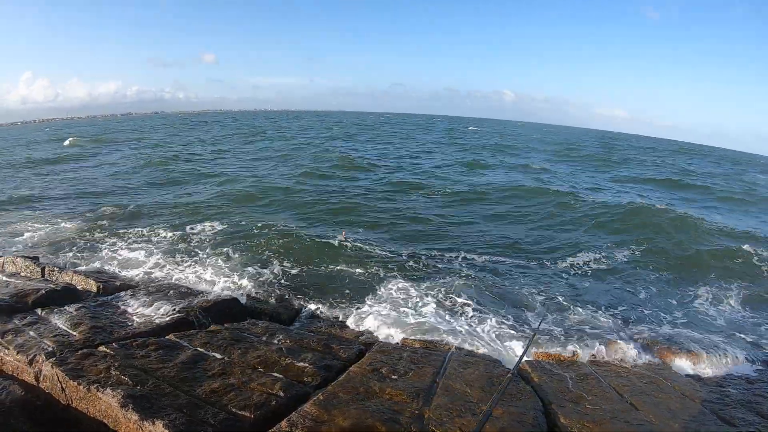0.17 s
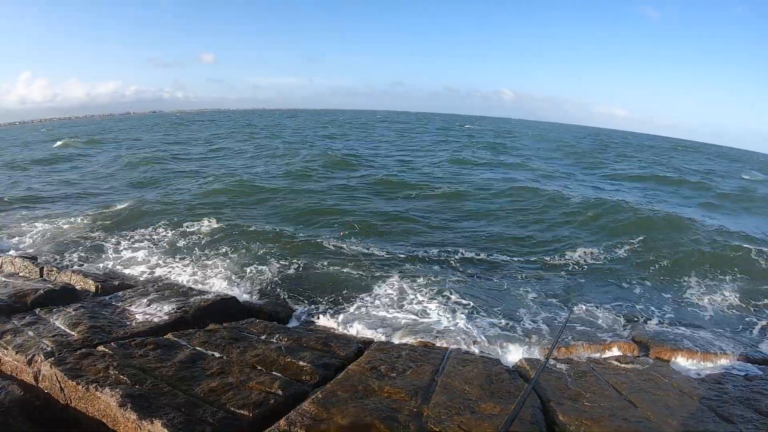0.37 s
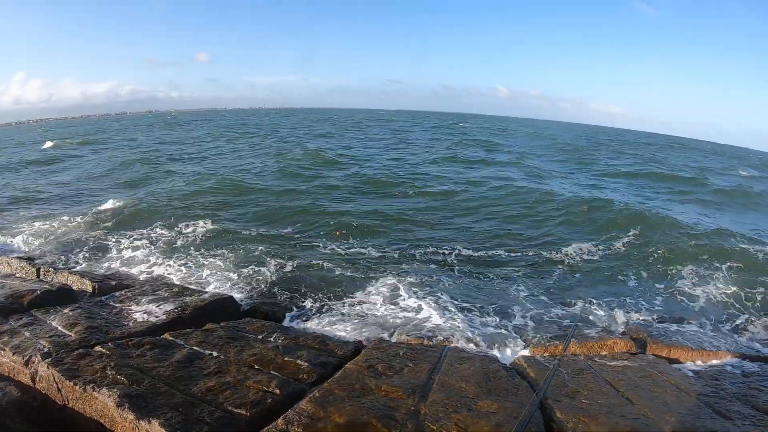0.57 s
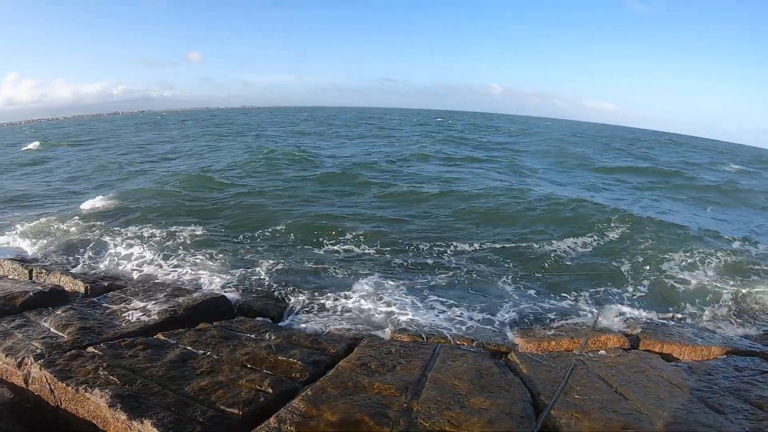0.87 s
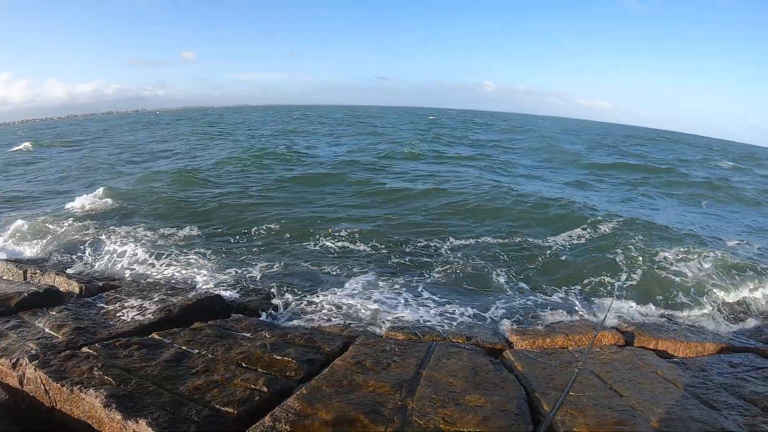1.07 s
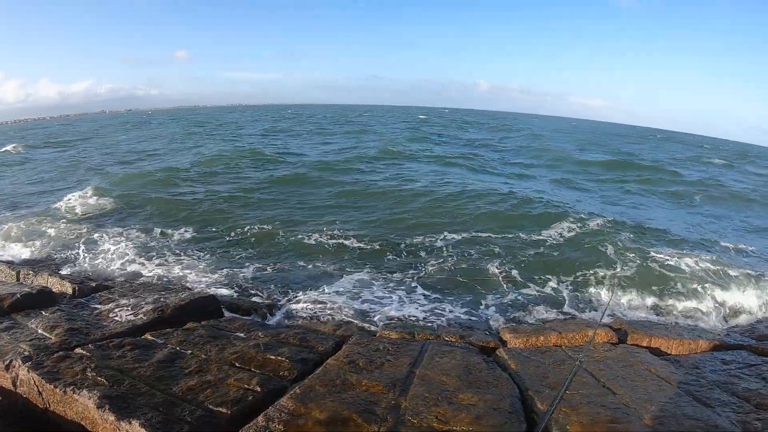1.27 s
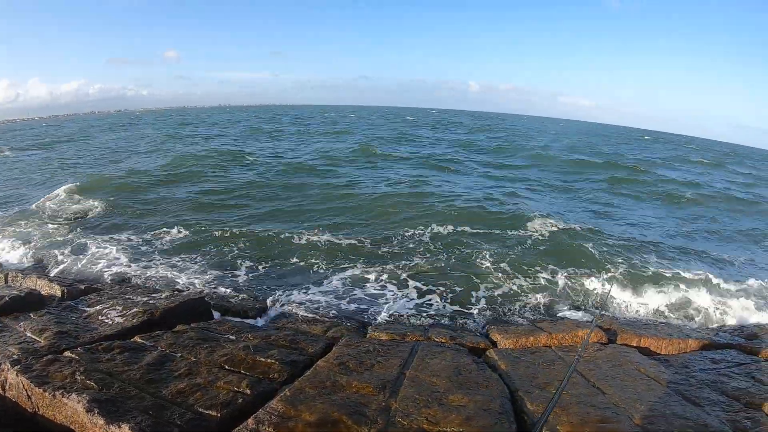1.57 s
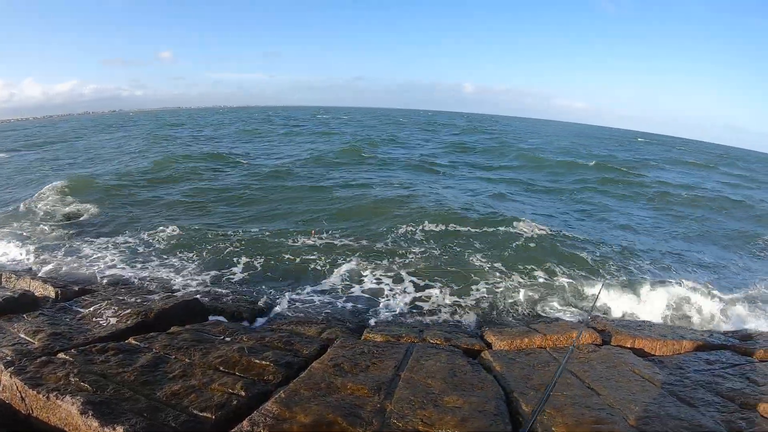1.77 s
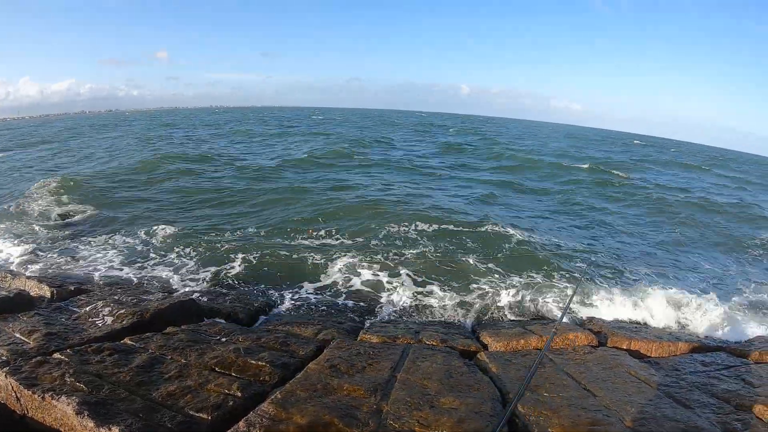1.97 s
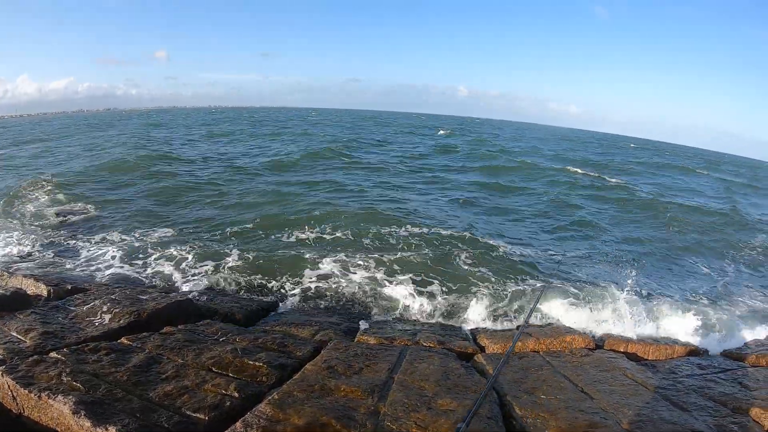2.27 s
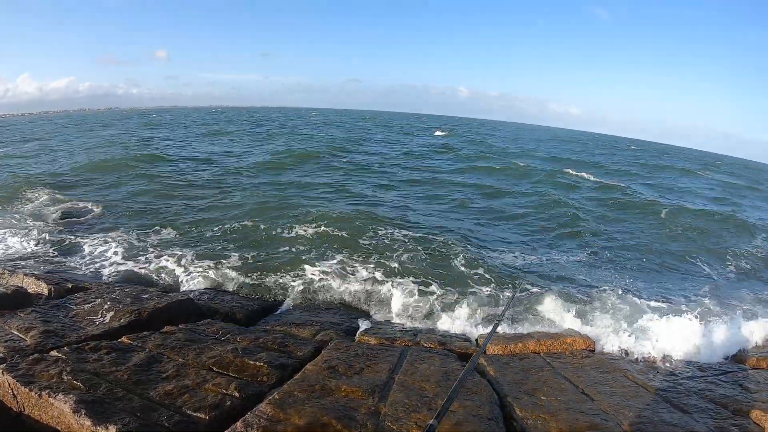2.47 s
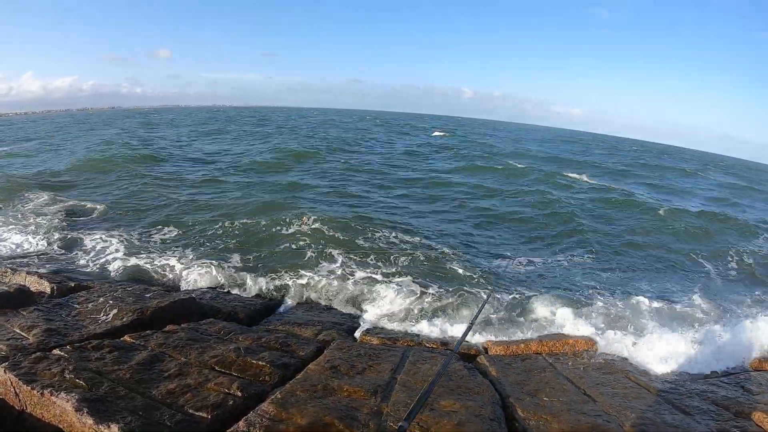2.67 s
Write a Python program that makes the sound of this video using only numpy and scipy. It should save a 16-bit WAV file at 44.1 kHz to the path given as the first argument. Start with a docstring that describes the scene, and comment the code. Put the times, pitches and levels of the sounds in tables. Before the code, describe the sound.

Sea waves wash against rocks a few metres away: low churn, one hollow clap, gulping bubbles and small slaps, then a brighter hissing breaker; outdoors, close mono microphone heavily buffeted by deep, uneven wind.

```python
"""Flat rocks of a jetty, a few metres from the waves: a low churn of water with gulping bubbles, a rising fizz
of foam and spray, a few slaps, one hollow clap and a late breaker. The wash is coloured noise with crowds of
chirping bubbles; the clap is a set of decaying modes. The slab in front and a nearer ledge mirror the wash,
combing its sound. Strong wind buffets the microphone: a deep uneven rumble of softly saturated low noise."""
import sys
import numpy as np
from scipy import signal
from scipy.fft import rfft, irfft, next_fast_len
from scipy.io import wavfile
from scipy.ndimage import uniform_filter1d, map_coordinates

SR = 44100
rng = np.random.default_rng(int(sys.argv[2]) if len(sys.argv) > 2 else 0)


def transcribe(signal):
    """Save signal, clipped to [-1, 1], as a 16-bit WAV file at the path in sys.argv[1]."""
    frames = np.atleast_2d(signal).T
    limited = np.clip(frames, -1, 1)
    pcm = np.round(limited * 32767).astype(np.int16)
    wavfile.write(sys.argv[1], SR, pcm)


def decibels_to_gain(level_db):
    """Convert a level in decibels to a linear amplitude gain (20 dB per decade)."""
    exponent = np.asarray(level_db, float) / 20
    return 10 ** exponent


N = 123479  # length in samples


def unit(x):
    """Scaled to rms 1."""
    return x / np.sqrt(np.mean(x ** 2) + 1e-20)


def curves(rows, at):
    """Every column after the first, read between the rows at the given times or pitches."""
    first, *columns = np.transpose(rows)
    return [np.interp(at, first, column) for column in columns]


def wobble(rate):
    """A smooth random curve with the given number of random knots a second."""
    knots = rng.standard_normal(N // 200)
    return map_coordinates(knots, [np.arange(N) * rate / SR])


def coloured(x, colour):
    """x filtered by (pitch_hz, relative gain_db) points, joined over log pitch, then scaled to rms 1."""
    size = next_fast_len(N + 8192)
    hz, gain_db = np.transpose(colour)
    log_pitch = np.log(np.fft.rfftfreq(size, 1 / SR) + .1)
    gain = decibels_to_gain(np.interp(log_pitch, np.log(hz + .1), gain_db, left=-120))
    return unit(irfft(rfft(x, size) * gain, size)[:N])


def patchy(patchy_db):
    """Noise with patches of random gain over frequency and time, rms 1."""
    spectrum = signal.stft(rng.standard_normal(N), nperseg=512)[2]
    field = uniform_filter1d(rng.standard_normal(spectrum.shape), size=6, axis=0)
    field = uniform_filter1d(field, size=10, axis=1)
    return unit(signal.istft(spectrum * decibels_to_gain(patchy_db * unit(field)), nperseg=512)[1][:N])


def bubbles(start_s, hz, peak_db, cycles, rise, size):
    """Damped sines of rising pitch with a soft start, each cut off after size samples."""
    t = np.arange(size) / SR
    life = t * (hz / cycles)[:, None]  # 1 after the given cycles of the starting pitch
    envelope = np.e * 3 * life * np.exp(-3 * life)  # peaks at 1, a third of the way through
    tone = np.sin(2 * np.pi * hz[:, None] * t * (1 + rise * life))
    ring = decibels_to_gain(peak_db)[:, None] * envelope * tone
    at = (start_s * SR).astype(int)[:, None] + np.arange(size)
    return np.bincount(at.ravel(), ring.ravel(), N + size)[:N]


def swarm(count, centre_hz, spread, cycles, scatter_db, size):
    """A random crowd of small bubbles, rms 1; pitches reach spread nepers either side of the centre."""
    when, pitch, loud = rng.random((count, 3)).T
    hz = np.clip(centre_hz * np.exp(spread * 2 * (pitch - .5)), 50, 16000)
    level_db = -scatter_db * np.log(loud + 1e-9)  # many soft bubbles, few loud ones
    return unit(bubbles(when * N / SR, hz, level_db, cycles + 0 * hz, 0.1253, size))


def water():
    """The wash: churn, foam, spray and breaker share one flicker and the slaps; gulps ring on top."""
    # levels of the wash before flicker and slaps: start_s, churn_db, foam_db, spray_db, mist_db (finest spray)
    wash_levels = [(0, -37, -42.5, -54, -63), (0.2, -34.5, -41.5, -54, -64), (0.4, -35, -41.5, -54.5, -62),
                   (0.6, -35, -43, -55, -66), (0.8, -35.0, -41.5, -53, -65), (0.95, -33, -41, -54.5, -64),
                   (1.1, -32.5, -40, -53, -60), (1.25, -33, -38.5, -51.5, -61),
                   (1.4, -32.5, -39, -50.5, -60), (1.6, -33.5, -38.0, -50.5, -58),
                   (1.8, -35.0, -40, -53, -60), (1.95, -32, -38, -50.5, -58), (2.1, -32.5, -39.0, -51, -57),
                   (2.3, -31.0, -39, -51, -57.5), (2.5, -31.5, -37, -50.5, -56),
                   (2.65, -32.5, -37.0, -50.5, -55.0), (2.8, -31.5, -38, -46.5, -58)]
    t = np.arange(N) / SR
    churn_db, foam_db, spray_db, mist_db = curves(wash_levels, t)
    slap_db, bright_db = slaps(t)
    flicker_db = 0.043 * wobble(8.3) + 0.52 * wobble(35.02) + 0.55 * wobble(120)
    low = decibels_to_gain(churn_db + 0.31 * flicker_db + 0.22 * slap_db) * churn()
    middle = decibels_to_gain(foam_db + 0.53 * flicker_db + slap_db) * foam()
    high = decibels_to_gain(0.77 * flicker_db + bright_db) * spray(spray_db, mist_db)
    hiss = decibels_to_gain(.7 * flicker_db + bright_db) * breaker(t)
    return low + middle + high + hiss + gulps()


def churn():
    """Low rolling water: patchy noise with a crowd of larger bubbles, rms 1."""
    # colour of the churn: pitch_hz, relative level_db (per Hz)
    churn_colour = [(80, -46), (150, -8.5), (300, -3), (600, 1), (900, -0.5), (1100, -3.5), (1400, -7.5),
                    (2000, -21), (4000, -62), (8000, -120)]
    crowd = swarm(count=1500, centre_hz=449.3, spread=1.116, cycles=4.42, scatter_db=1.0, size=2200)
    return coloured(patchy(0.23) + 0.25 * crowd, churn_colour)


def foam():
    """Fizzing foam: patchier noise with a denser crowd of small bubbles, rms 1."""
    # colour of the foam: pitch_hz, relative level_db (per Hz)
    foam_colour = [(600, -52), (1200, -6.5), (1500, -1), (1900, 1.5), (2200, -0.5), (2450, -2), (2800, -3),
                   (3400, -6.5), (4000, -6.5), (5500, -11), (7000, -16.5), (10000, -43)]
    crowd = swarm(count=4000, centre_hz=2797, spread=0.95, cycles=4.9, scatter_db=2.0, size=260)
    return coloured(patchy(0.79) + 0.2 * crowd, foam_colour)


def spray(spray_db, mist_db):
    """Spray and its finest mist: one fizz of noise and tiny bubbles, filtered into two bands."""
    # colour of the spray: pitch_hz, relative level_db (per Hz)
    spray_colour = [(3000, 7.5), (5500, -8.5), (7000, -1), (9000, -2.5), (11000, -10), (13000, -21.5),
                    (15500, -25)]
    # colour of the finest spray: pitch_hz, relative level_db (per Hz)
    mist_colour = [(6000, -45), (10000, -5), (11500, 0), (14000, -1), (15000, -9), (15700, -6)]
    crowd = swarm(count=7000, centre_hz=9150, spread=0.65, cycles=1.2, scatter_db=2.0, size=40)
    fizz = patchy(0.73) + 0.64 * crowd
    return decibels_to_gain(spray_db) * coloured(fizz, spray_colour) + decibels_to_gain(mist_db) * coloured(fizz, mist_colour)


def breaker(t):
    """A breaker rolling onto the slab: a late swell of bright, very patchy hiss."""
    # swell of the breaker before flicker and slaps: start_s, level_db
    breaker_swell = [(1.9, -73), (2.15, -51), (2.4, -48), (2.6, -49), (2.8, -50)]
    # colour of its hiss: pitch_hz, relative level_db (per Hz)
    hiss_colour = [(3000, -23), (4000, 1), (4700, 2.5), (5500, -5), (7000, -8), (8300, -7), (10000, -30)]
    return decibels_to_gain(curves(breaker_swell, t)[0]) * coloured(patchy(1.3), hiss_colour)


def slaps(t):
    """Slaps of spray on stone: brief bell-shaped lifts in dB, for the foam and for the brighter layers."""
    # the slaps: peak_s, foam_lift_db, bright_lift_db, length_s (peak to 1/e of the lift)
    slap_rows = [(1.075, 3, 3, .012), (1.25, 2.5, .5, .012), (1.35, 2, 1, .012), (1.965, 3, 1, .014),
                 (2.045, 2.5, 0, .01), (2.41, 2.5, 4.5, .005), (2.73, 2.5, 2, .015)]
    return sum(np.outer(lifts_db, np.exp(-((t - peak_s) / length_s) ** 2))
               for peak_s, *lifts_db, length_s in slap_rows)


def gulps():
    """Large bubbles gulped between the stones, each a damped sine of rising pitch."""
    # the gulps: start_s, pitch_hz (at the start), peak_db (before the mirroring), cycles (nominal life)
    gulp_rows = [(.915, 594, -33, 18), (0.919, 196, -27, 9), (1.031, 278, -29.5, 8.9),
                 (1.107, 320, -28.5, 3.3), (1.239, 136, -27.5, 4), (1.35, 275, -33.5, 5.2),
                 (1.986, 1002, -29.5, 16)]
    start_s, hz, peak_db, cycles = np.transpose(gulp_rows)
    return bubbles(start_s, hz, peak_db, cycles, rise=0.072, size=6000)


def mirrored(x):
    """The direct sound plus slightly late copies off slab and ledge, scaled to keep the power about even."""
    # lag of the mirror image in the rock slab: start_s, lag_ms
    slab_lag = [(0, .54), (.3, .54), (.6, .53), (1.2, .528), (1.5, .538), (1.7, .548), (2.1, .54),
                (2.4, .536), (2.8, .55)]
    # strength of that image against the direct sound, before the band factor: start_s, share (ratio)
    slab_share = [(0, .08), (.4, .12), (.8, .18), (1.1, .34), (1.5, .4), (1.9, .34), (2.2, .2), (2.5, .1),
                  (2.8, .1)]
    # the rough slab mirrors some bands better than others: pitch_hz, part of the share (factor)
    slab_bands = [(700, .3), (1200, .5), (1900, 1.1), (3200, 1), (4500, .45), (6500, .45), (8000, .9),
                  (15000, .9)]
    # strength of a nearer ledge's image in the lows: start_s, share (ratio)
    ledge_share = [(0, 0.028), (.5, 0.067), (.9, 0.12), (1.3, 0.26), (1.7, 0.33), (2.1, 0.42), (2.5, 0.33),
                   (2.8, 0.16)]
    ledge_lag_ms, ledge_top_hz = .37, 2100  # the ledge's share halves at its top

    hz, t, spectrum = signal.stft(x, SR, nperseg=1024)
    pitch = hz[:, None]

    def late(lag_ms):
        """A delay, as a phase turn growing with pitch."""
        return np.exp(-2j * np.pi * pitch * lag_ms / 1000)

    slab = curves(slab_share, t)[0] * curves(slab_bands, hz)[0][:, None]
    ledge = curves(ledge_share, t)[0] / (1 + (pitch / ledge_top_hz) ** 6)
    comb = 1 + slab * late(curves(slab_lag, t)[0]) + ledge * late(ledge_lag_ms)
    comb = comb / np.sqrt(1 + slab ** 2 + ledge ** 2)
    return signal.istft(spectrum * comb, SR, nperseg=1024)[1][:N]


def clap():
    """One hollow clap of water in a crevice: a few quickly dying modes struck once, with a soft onset."""
    # its ringing: pitch_hz, level_db (at the strike, before the onset), t60_s
    clap_modes = [(334, -28, .06), (600, -21, .04), (1080, -24, .035), (1540, -30, .08), (1850, -32, .035),
                  (2190, -34, .03)]
    t = np.maximum(np.arange(N) / SR - .4825, 0)  # seconds since the strike
    ring = sum(decibels_to_gain(db - 60 * t / t60_s) * np.sin(2 * np.pi * hz * t) for hz, db, t60_s in clap_modes)
    return ring * (1 - np.exp(-t / .0004))


def wind():
    """Wind on the microphone: deep pushes and a faster lumpy flutter, saturating softly together."""
    # drive into the saturation: start_s, push_db, flutter_db
    wind_drive = [(0.0, -46, -32), (0.1, -24, -38.5), (0.27, -29, -29), (0.33, -24.5, -43),
                  (0.38, -10, -37), (0.4, -17, -30.5), (0.59, -21, -37), (0.65, -19, -26.5),
                  (0.77, -20.5, -31), (0.93, -20.5, -28.5), (0.96, -25.5, -34), (1.07, -16.5, -31),
                  (1.22, -20, -32), (1.33, -25, -30), (1.56, -15, -30), (1.63, -20, -32),
                  (1.78, -25.5, -34), (1.87, -16.5, -30.5), (1.92, -21, -23.5), (2.03, -23.5, -31.5),
                  (2.35, -21, -26.5), (2.45, -31, -30.5), (2.48, -16, -36), (2.53, -10.5, -21.5),
                  (2.62, -19.5, -35), (2.66, -17, -22), (2.8, -27, -31)]
    # colour of the deep pushes before evening out: pitch_hz, relative level_db (per Hz)
    push_colour = [(1.3, -9), (4, -3), (10, 0), (16, -2), (26, -3), (36, -4), (55, -11), (80, -40),
                   (120, -90)]
    # colour of the flutter before its lumps: pitch_hz, relative level_db (per Hz)
    flutter_colour = [(30, -41), (55, 0.5), (90, 0.5), (130, -8), (220, -22), (500, -54), (1500, -120)]
    squash = .36  # pressure at which the saturation bends
    lump_s, evenness = 0.14, 0.64  # the pushes keep a like size over this time; 1 = fully evened

    push_db, flutter_db = curves(wind_drive, np.arange(N) / SR)
    lumps = coloured(rng.standard_normal(N), push_colour)
    power = uniform_filter1d(lumps ** 2, int(lump_s * SR))
    power = np.abs(uniform_filter1d(power, int(lump_s * SR / 2))) + .01
    push = decibels_to_gain(push_db) * unit(lumps / power ** (evenness / 2))
    lumpy = decibels_to_gain(0.35 * wobble(19)) * coloured(rng.standard_normal(N), flutter_colour)
    flutter = decibels_to_gain(flutter_db) * unit(lumpy)
    return 1.13 * squash * np.tanh((push + flutter) / squash)


def scene():
    """Mirrored water and the clap in the rocks, plus wind on the microphone, in mono."""
    return (mirrored(water()) + clap() + wind())[None]


def top_cut(x):
    """Nothing passes above the cut-off."""
    return signal.sosfilt(signal.butter(12, 15745, fs=SR, output="sos"), x)


def record(dry):
    """The finished mix as it is stored."""
    return top_cut(dry)


dry = scene()
out = record(dry)
transcribe(out)
```